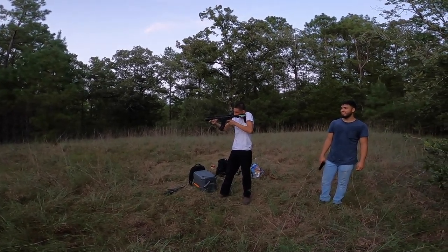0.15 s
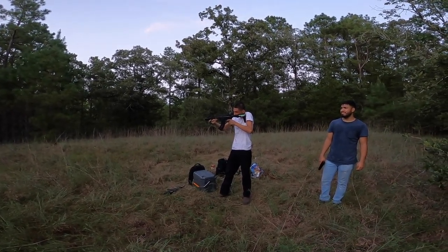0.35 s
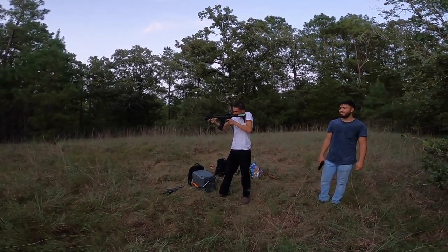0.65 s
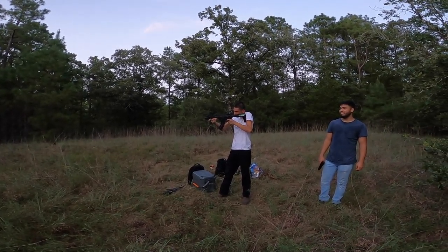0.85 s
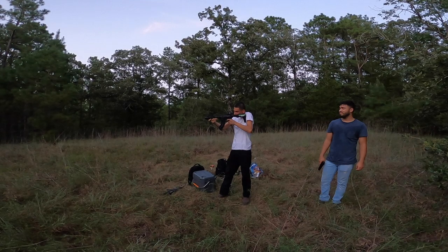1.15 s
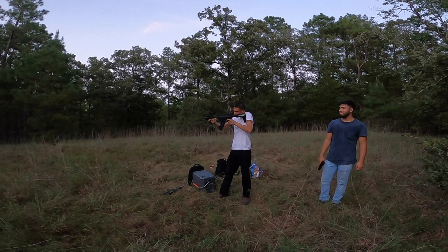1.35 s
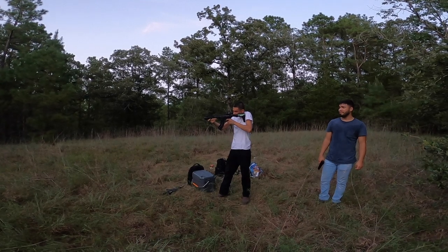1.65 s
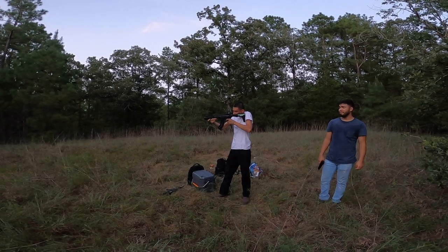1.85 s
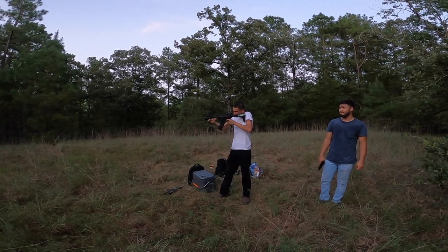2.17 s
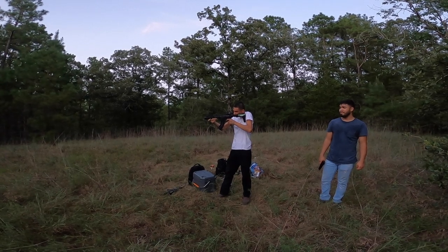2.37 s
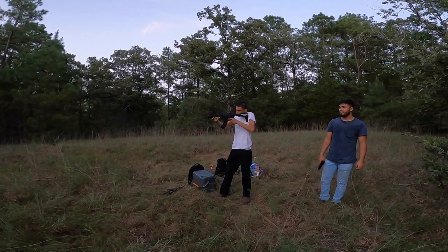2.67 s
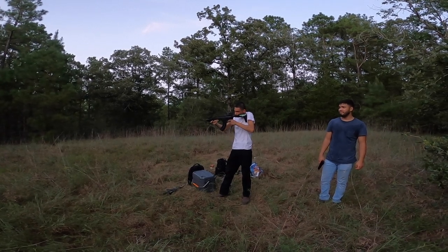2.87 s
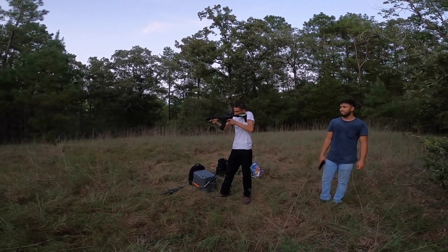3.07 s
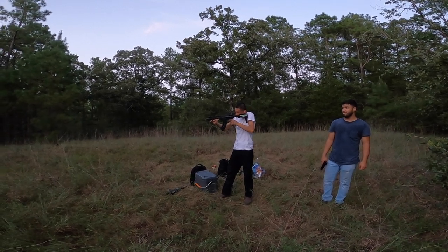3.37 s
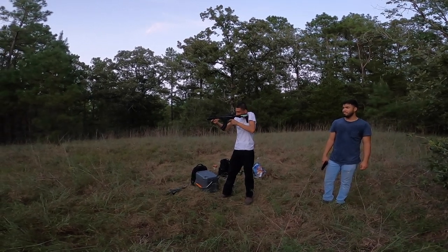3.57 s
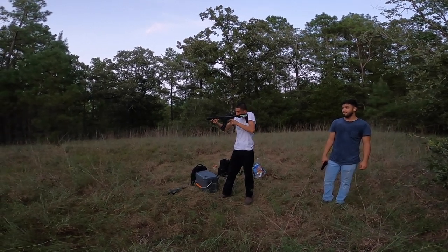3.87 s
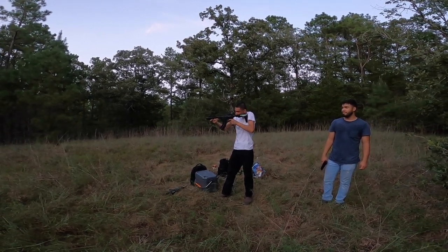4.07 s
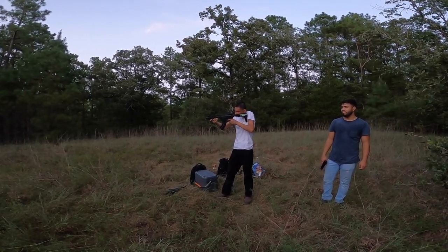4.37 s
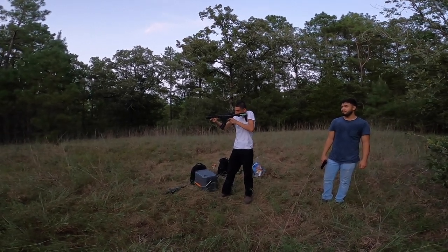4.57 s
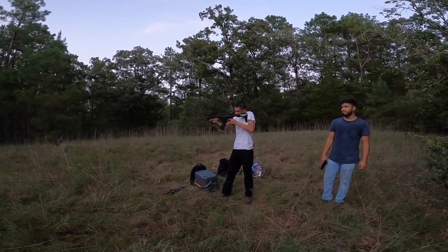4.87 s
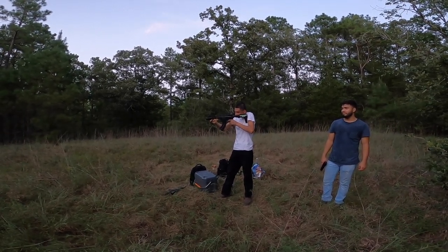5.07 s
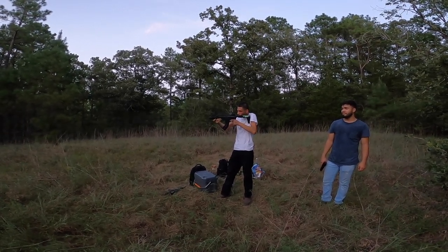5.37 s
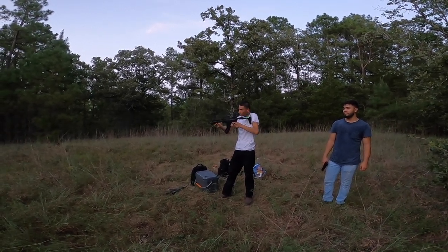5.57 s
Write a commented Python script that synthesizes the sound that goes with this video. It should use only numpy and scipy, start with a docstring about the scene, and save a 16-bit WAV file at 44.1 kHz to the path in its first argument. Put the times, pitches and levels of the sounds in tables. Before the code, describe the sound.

A nearby rifle fires two sharp, overloaded cracks, each just after a very quick electronic buzz and swell. Each shot booms off the trees around an open clearing and rolls away, losing its treble. A spent casing lands with a tiny ping after the first. Quiet crickets, a chipping bird and distant rumble come before the shots, drop away as the stereo microphone's level ducks, and slowly return between them.

```python
"""A rifle fires twice near a stereo microphone in a grassy clearing ringed by forest.
A quick, buzzy electronic stutter and swell sound just before each clipped crack. The trees return a boom
and a long roll that the air makes ever duller; an earlier shot still dies away, and a casing pings.
The gain control ducks at each shot and slowly lets crickets, a chipping bird and far rumble back in."""
import sys
import numpy as np
from scipy import signal
from scipy.io import wavfile
from scipy.ndimage import uniform_filter1d

SR = 44100
rng = np.random.default_rng(int(sys.argv[2]) if len(sys.argv) > 2 else 0)


def transcribe(signal):
    """Save signal, clipped to [-1, 1], as a 16-bit WAV file at the path in sys.argv[1]."""
    frames = np.atleast_2d(signal).T
    limited = np.clip(frames, -1, 1)
    pcm = np.round(limited * 32767).astype(np.int16)
    wavfile.write(sys.argv[1], SR, pcm)


N = 252368
TIME = np.arange(N) / SR

# The rifle shots. Each row: time in seconds, blast level in dB, echo level in dB.
SHOTS = [(2.5193, 26.5, 4.5), (5.2072, 24.5, 1.5)]
# Stereo width of the echoes. Each row: frequency in Hz, left-right likeness from -1 to 1.
ECHO_LIKENESS = [(60, 0.93), (130, 1), (290, 1), (640, 0.85), (1410, 0.6), (3100, 0.24), (6820, -0.14),
                 (15000, -0.13)]
# The side the echoes come from. Each row: frequency in Hz, left over right in dB.
ECHO_BALANCE = [(60, -1), (110, 0.0), (200, 1), (380, 3), (700, 6), (1290, 8), (2380, 12.5), (4400, 5),
                (8120, 0.5), (15000, -1.5)]
NEAR_TREES_S, FAR_EDGE_S = 0.067, 0.37   # echo delays at the microphone


def from_db(db):
    """Decibels to gain."""
    return 10 ** (np.asarray(db) / 20)


def rms_one(x):
    """Scale to an rms of 1."""
    return x / np.sqrt(np.mean(x ** 2) + 1e-20)


def at_hz(points, hz):
    """Read a table on a log-frequency axis."""
    freqs, values = np.array(points).T
    return np.interp(np.log(hz), np.log(freqs), values)


def pan(db):
    """Left and right gains for a level difference."""
    return from_db(np.array([[db], [-db]]) / 2)


def filtered(x, hz, kind, order=2):
    """Butterworth filter."""
    sos = signal.butter(order, np.clip(hz, 10, .49 * SR), kind, fs=SR, output="sos")
    return signal.sosfilt(sos, x + 1e-18)


def swell(s, length):
    """A smooth hump of height 1 around a moment."""
    return np.exp(-2 * ((TIME - s) / length) ** 2)


def hiss(low_hz, high_hz, order=3):
    """A band of noise, unrelated in the two channels."""
    return rms_one(filtered(rng.standard_normal((2, N)), [low_hz, high_hz], "band", order))


def noise_bands(spectrum, likeness, balance, grain_db=0):
    """Half-octave stereo noise bands by centre in Hz, together of rms 1; grain roughens the level."""
    edges = np.geomspace(22, 17000, 21)
    grain = from_db(grain_db * np.interp(TIME, TIME[::64], rng.standard_normal(len(TIME[::64]))))
    white = rng.standard_normal((2, 2, N)) * grain
    bands = {}
    for k, hz in enumerate(np.sqrt(edges[1:] * edges[:-1])):
        mid, side = filtered(white[k % 2], edges[k:k + 2], "band", order=3)
        alike = np.clip(at_hz(likeness, hz), -1, 1)
        pair = np.sqrt(1 + alike) * mid + np.sqrt(1 - alike) * side * [[1], [-1]]
        bands[hz] = pair * from_db(at_hz(spectrum, hz)) * pan(at_hz(balance, hz))
    total = np.std(sum(bands.values()))
    return {hz: band / total for hz, band in bands.items()}


def stereo_noise(spectrum, likeness, balance):
    """Steady noise of rms 1 with a given colour, width and side."""
    return sum(noise_bands(spectrum, likeness, balance).values())


def add(out, s, sound):
    """Mix a short stereo sound in at a moment."""
    start = round(s * SR)
    out[:, start:start + sound.shape[1]] += sound[:, :N - start]


def clearing(air_db=-53.5, grass_db=-70.0, leaves_db=-72.5):
    """Far rumble and faint hiss, a brief rustle of grass and leaves, and two soft bumps."""
    # Colour of the quiet clearing. Each row: frequency in Hz, relative density in dB.
    spectrum = [(15, -30), (25, -10.5), (92, -4), (175, -9.5), (212, -0.5), (301, -19.5), (354, -15.5),
                (695, -29), (911, -26.5), (2110, -36), (3160, -36), (6380, -42.5), (7310, -38.5),
                (8140, -42), (16000, -41.5)]
    # Its width. Each row: frequency in Hz, left-right likeness from -1 to 1.
    likeness = [(60, 0.72), (180, 0.7), (550, 0.96), (1650, -0.18), (4970, -0.62), (15000, 0.02)]
    # Its side. Each row: frequency in Hz, left over right in dB.
    balance = [(60, 0), (180, 1), (550, -4.5), (1650, 8.5), (4970, 7.5), (15000, -8.5)]
    # Low bumps. Each row: centre in seconds, length in seconds, level in dB.
    low_bumps = [(1.016, 0.027, -47), (2.163, 0.032, -45)]
    air = from_db(air_db) * stereo_noise(spectrum, likeness, balance)
    grass = from_db(grass_db) * swell(0.81, 0.27) * hiss(2200, 3800)
    leaves = from_db(leaves_db) * swell(0.91, 0.47) * hiss(1300, 4700)
    bumps = hiss(74, 148) * sum(from_db(db) * swell(s, length) for s, length, db in low_bumps)
    return air + grass + leaves + bumps


def insect_chorus():
    """Far insects blend into thin, steady bands of hiss."""
    # The chorus bands. Each row: centre in Hz, width in Hz, level in dB.
    bands = [(3234, 460, -83), (3790, 250, -84.5), (7260, 600, -82.5), (9370, 1600, -79)]
    return sum(from_db(db) * hiss(hz - width / 2, hz + width / 2) for hz, width, db in bands)


def crickets(chirp_s=.115, strokes_per_s=34, stroke_depth=.6):
    """Two near crickets chirp evenly, each chirp a few wing strokes on one pitch."""
    # Runs of chirps. Each row: start, end and chirp period in seconds, pitch in Hz, level in dB.
    runs = [(.11, 1.74, .249, 7150, -76.5), (1.91, 2.4, .295, 7160, -76.5), (4.62, 5.2, .222, 7150, -74.5),
            (.25, 2.45, .233, 7660, -82), (4.41, 5.2, .21, 7660, -80)]
    chirps = np.zeros(N)
    for start, end, period, hz, db in runs:
        age = (TIME - start) % period
        singing = (TIME > start) * (TIME < end)
        envelope = np.sqrt(np.abs(np.sin(np.pi * np.minimum(age / chirp_s, 1)))) * singing
        strokes = 1 - stroke_depth * np.cos(2 * np.pi * strokes_per_s * age)
        chirps += from_db(db) * envelope * strokes * np.sin(2 * np.pi * hz * TIME)
    flutter = 1 + 1.2 * rms_one(filtered(rng.standard_normal((2, N)), 100, "low"))
    return chirps * flutter   # uneven wing strokes widen each note


def bird(attack_s=0.0018, chip_t60=0.55, trees_db=-7, trees_t60=0.28):
    """A bird's high chips linger among the trees."""
    # The chips. Each row: start in seconds, level in dB.
    chips = [(.008, -66), (.755, -65.5), (1.418, -62.5), (1.970, -60), (4.243, -63.5)]
    envelope = np.zeros(N)
    for s, db in chips:
        age = np.maximum(TIME - s, 0)
        decay = from_db(-60 * age / chip_t60) + from_db(trees_db - 60 * age / trees_t60)
        envelope += from_db(db) * (1 - np.exp(-age / attack_s)) * decay
    return envelope * hiss(5950, 7850, order=6)


def roll_gain(age, level_db=2, grass_db=-10, loss_db_per_s=11):
    """Grass answers first; the roll grows from near trees to far edge, then spreads and is absorbed."""
    decades = np.log10(np.maximum(age, NEAR_TREES_S) / FAR_EDGE_S)
    build_db = 7.5 * np.minimum(decades, 0)
    spread_db = 22.5 * np.maximum(decades, 0)
    absorbed_db = loss_db_per_s * np.maximum(age - FAR_EDGE_S, 0)
    trees_db = build_db - spread_db - absorbed_db
    return (age > 0) * from_db(level_db + np.where(age < NEAR_TREES_S, grass_db, trees_db))


def forest_roll(earlier_shot_s=-2.734, earlier_shot_db=1.5, slaps_per_s=12, slap_db=4.5, edge_db=2):
    """Countless trunks scatter the blast; later echoes have come further and lost their treble."""
    # Colour of the roll as it starts. Each row: frequency in Hz, relative density in dB.
    spectrum = [(30, -24.5), (70, -15), (140, -19), (230, -16.5), (340, -3.5), (480, 3.5), (720, -6),
                (1000, -2.5), (1600, -6), (3000, -8.5), (6000, -17.5), (10000, -26), (15000, -34.5)]
    # Loss in air and leaves, beyond that of the low mids. Each row: frequency in Hz, dB per second.
    air_loss = [(60, 2), (200, -3.5), (400, -1.75), (600, 1.5), (1000, 4.5), (2000, 12.5), (4000, 29),
                (6000, 41), (8500, 52.5), (15000, 106)]
    bands = noise_bands(spectrum, ECHO_LIKENESS, ECHO_BALANCE, grain_db=-1.5)
    # Single trunks stand out as slaps, the same ones for every shot.
    trunk_delays = np.flatnonzero(rng.random(N) < slaps_per_s / SR) / SR
    slaps = sum((swell(delay, 0.0033) for delay in trunk_delays), np.zeros(N))
    slaps_db = slap_db * np.minimum(slaps, 1)
    out = np.zeros((2, N))
    for s, echo_db in [(earlier_shot_s, earlier_shot_db)] + [(s, db) for s, _, db in SHOTS]:
        age = np.maximum(TIME - s, 0)
        wall_db = edge_db * swell(s + FAR_EDGE_S, 0.02)   # the far wall of trees answers as one
        dulled = sum(band * from_db(-at_hz(air_loss, hz) * age) for hz, band in bands.items())
        out += dulled * roll_gain(age) * from_db(echo_db + np.interp(age, TIME, slaps_db) + wall_db)
    return out


def boom(level_db=-6.5, peak_s=.2, build_db_per_s=24.5, fall_db_per_decade=51.5):
    """The near trees return the bass of the blast: it builds, then falls away with distance."""
    # Colour of the boom. Each row: frequency in Hz, relative density in dB.
    spectrum = [(30, -24.5), (60, -15), (95, -6.5), (135, 2.5), (190, -7), (300, -5), (600, -27),
                (1500, -70)]
    envelope = np.zeros(N)
    for s, _, echo_db in SHOTS:
        age = TIME - s
        build_db = build_db_per_s * np.minimum(age - peak_s, 0)
        fall_db = fall_db_per_decade * np.log10(np.maximum(age / peak_s, 1))
        envelope += (age > 0) * from_db(echo_db + level_db + build_db - fall_db)
    return envelope * stereo_noise(spectrum, ECHO_LIKENESS, ECHO_BALANCE)


def casing(s=3.295, hz=12800, db=-57, t60=0.043):
    """The spent brass lands in the grass with a tiny ping."""
    age = np.maximum(TIME - s, 0)
    return from_db(db - 60 * age / t60) * np.sin(2 * np.pi * hz * age)


def lead_in_db(age, swell_db_per_s=3004, hold_s=0.02, release_db_per_s=5999):
    """Level of the electronic lead-in to a crack at age 0: a steep swell, a hold, a sudden release."""
    return swell_db_per_s * np.minimum(age + hold_s, 0) - release_db_per_s * np.maximum(age, 0)


def electronic_swell(level_db=8.0):
    """A brief electronic swell of hollow noise just before each crack."""
    noise = hiss(720, 1150)[0] + from_db(-13) * hiss(310, 4000)
    return noise * sum(from_db(level_db + lead_in_db(TIME - s)) for s, _, _ in SHOTS)


def electronic_stutter(blast, shock, beat_s=.01064, loudest_db=19, faintest_db=-27):
    """A quick, buzzy electronic stutter just before each crack: four filtered copies of its sound."""
    beat = blast + from_db(-6) * shock
    bite = from_db(-1) * filtered(beat, [1800, 4800], "band", order=1)
    beat = filtered(beat + bite, 45, "high", order=1)
    beat = filtered(beat, 5600, "low", order=3)
    out = np.zeros((2, N))
    for s, _, _ in SHOTS:
        for k in range(1, 5):
            beat_db = max(loudest_db + lead_in_db(-k * beat_s), faintest_db)
            add(out, s - k * beat_s, (-1) ** k * from_db(beat_db) * beat)   # polarity alternates
    return out


def muzzle_blast(gas_db=-15, gas_t60=0.066, jet_db=-8, jet_t60=0.029, build_s=0.0002):
    """The body of the shot: a short ring and a burst of gas noise."""
    # The ring at the microphone. Each row: pitch in Hz, level in dB, t60 in seconds, left over right in dB.
    modes = [(54, -10.5, 0.068, -3.5), (144.5, -13.5, 0.11, -9), (237, -6, .055, 4),
             (496, -5.5, 0.03, -3.5), (586, -3.5, 0.027, 7), (776, -21, 0.043, 2.5),
             (895, -21.5, 0.042, 4.5), (986, -10, 0.033, 19), (1330, -17.5, 0.052, 3),
             (2145, -26, 0.039, 3), (3520, -28.5, 0.039, 3.5), (3205, -25, 0.037, -0.5)]
    # Hiss of the muzzle gas. Each row: frequency in Hz, relative density in dB.
    spectrum = [(40, -29), (200, -3), (380, -5), (600, 7), (1200, -7), (2000, -8.5), (3700, -9.5),
                (6000, -23), (9000, -22), (12000, -36), (16000, -37.5)]
    t = TIME[:SR // 6]
    ring = sum(pan(side_db) * from_db(db - 60 * t / t60) * np.cos(2 * np.pi * hz * t)
               for hz, db, t60, side_db in modes)
    gas = stereo_noise(spectrum, likeness=[(500, .6), (3000, 0.33), (12000, 0.12)],
                       balance=[(500, 1), (2000, 22.0), (4400, 11.0), (10000, 1)])
    gas_decay = from_db(gas_db - 60 * t / gas_t60) + from_db(jet_db - 60 * t / jet_t60)
    return ring * (1 - np.exp(-t / build_s)) + rms_one(gas[:, -len(t):]) * gas_decay


def shock_wave(shock_s=0.00033, top_hz=3200, ground_s=.0009, ground_db=-1, left_db=3):
    """A steep front with its suction, and its bounce off the ground."""
    t = TIME[:SR // 6]
    front = (1 - t / shock_s) * np.exp(-t / shock_s)
    bounce = from_db(ground_db) * np.interp(t - ground_s, t, front, left=0)
    return pan(left_db) * filtered(front + bounce, top_hz, "low")


def rifle_cracks(blast, shock, shock_db=5.0):
    """Muzzle blast and shock wave arrive together as one crack per shot."""
    out = np.zeros((2, N))
    for s, blast_db, _ in SHOTS:
        add(out, s, from_db(blast_db) * (blast + from_db(shock_db) * shock))
    return out


def scene():
    """Shots, each led by an electronic stutter, with their echoes and the evening around them."""
    blast, shock = muzzle_blast(), shock_wave()
    lead_in = electronic_stutter(blast, shock) + electronic_swell()
    gunfire = rifle_cracks(blast, shock) + forest_roll() + boom() + casing()
    return lead_in + gunfire + crickets() + insect_chorus() + bird() + clearing()


def microphones(x, lag_s=.00008, crossover_hz=1200, top_hz=13000, bottom_hz=32):
    """Low sound reaches the left port a little late; the deepest bass and highest treble fall away."""
    low = filtered(x[0], crossover_hz, "low", order=1)
    left = x[0] - low + np.interp(TIME - lag_s, TIME, low)
    return filtered(filtered(np.array([left, x[1]]), top_hz, "low"), bottom_hz, "high")


def gain_control(x, threshold_db=-22, range_db=26, release_db_per_s=10.0):
    """The gain drops at once on a loud sound, as far as its range allows, and creeps back."""
    power = uniform_filter1d(np.mean(x ** 2, axis=0), size=200)
    level_db = 10 * np.log10(np.maximum(power, 1e-12))
    cut_db = np.clip(level_db - threshold_db, 0, range_db)
    held_db = np.maximum.accumulate(cut_db + release_db_per_s * TIME) - release_db_per_s * TIME
    return x * from_db(-uniform_filter1d(held_db, size=60))


def record(dry):
    """Microphones, gain control, overload on the cracks, and a steep cut of the highest treble."""
    x = gain_control(microphones(dry))
    clipped = x / (1 + x ** 6) ** (1 / 6)
    return signal.sosfilt(signal.ellip(10, .1, 70, 15900, fs=SR, output="sos"), clipped)


dry = scene()
out = record(dry)
transcribe(out)
```